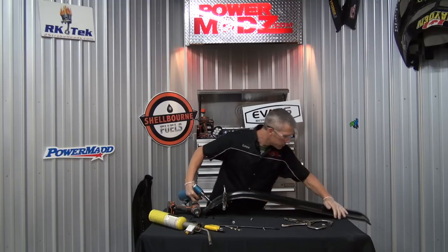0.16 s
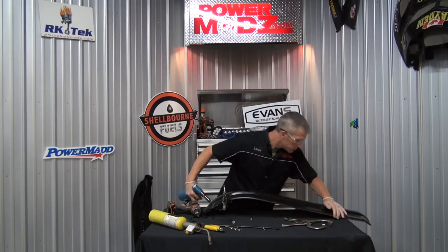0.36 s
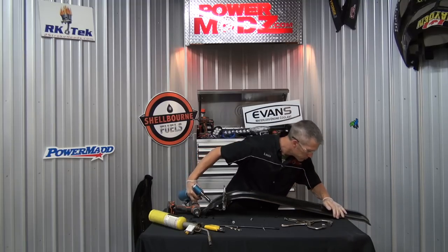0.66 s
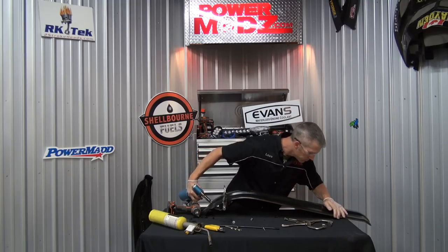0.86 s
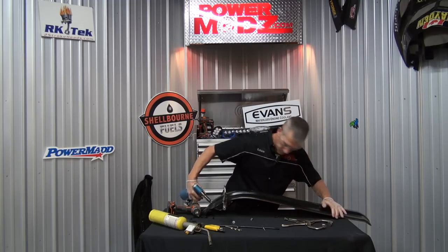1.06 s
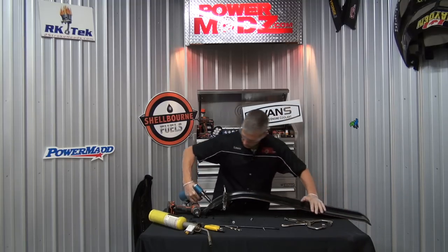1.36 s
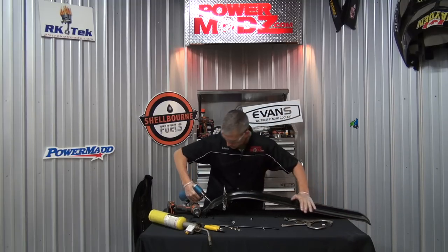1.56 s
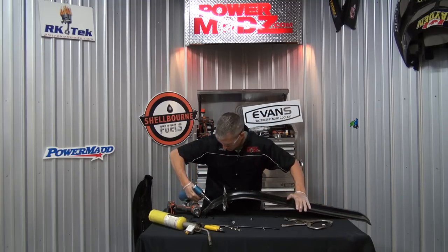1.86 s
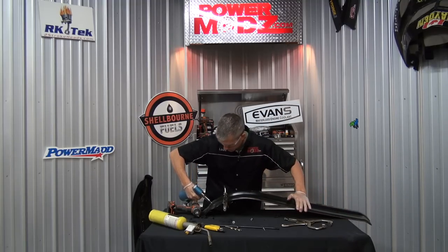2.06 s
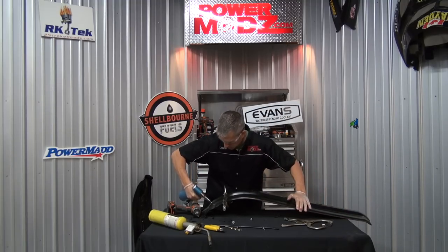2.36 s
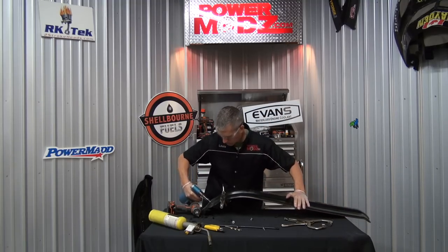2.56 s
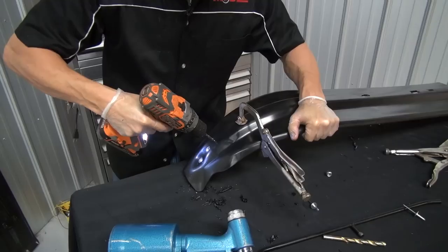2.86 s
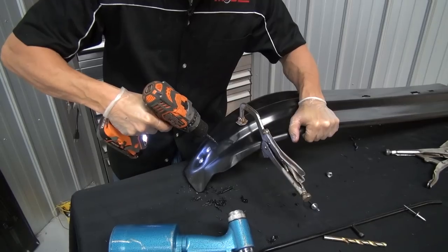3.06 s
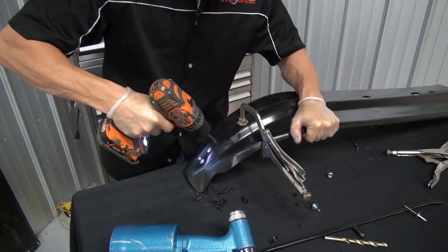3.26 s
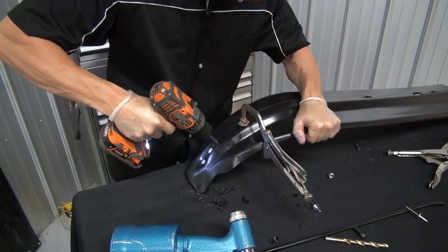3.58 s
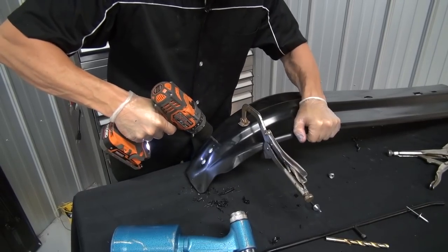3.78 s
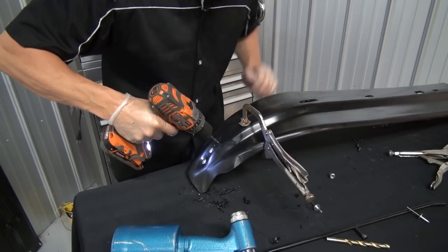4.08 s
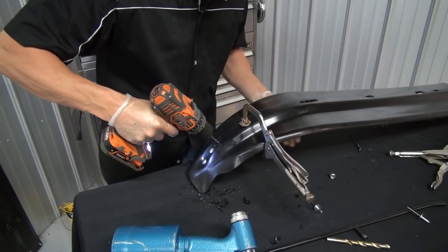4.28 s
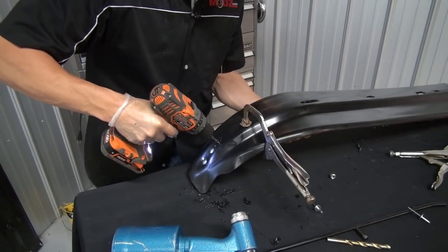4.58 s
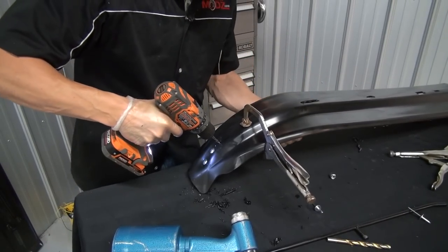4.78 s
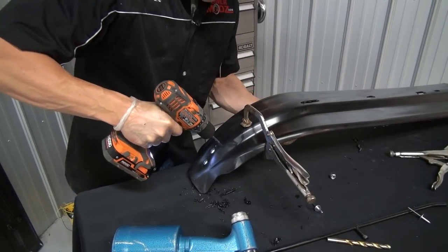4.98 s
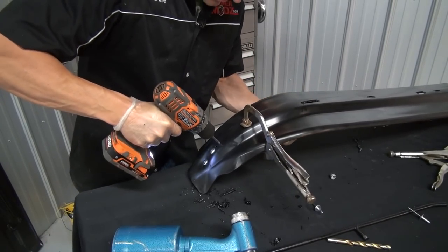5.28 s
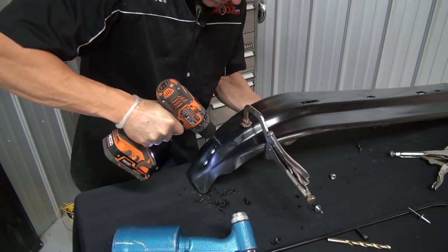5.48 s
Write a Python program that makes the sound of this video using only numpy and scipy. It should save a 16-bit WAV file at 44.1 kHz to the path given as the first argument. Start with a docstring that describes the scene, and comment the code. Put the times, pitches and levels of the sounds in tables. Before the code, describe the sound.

Over faint workshop hiss, a plastic ski knocks sharply on a bench at about 0.2 seconds. From 1.1 to 2 seconds it is shifted with quiet sliding, a tiny squeak, brushing sleeves, tool ticks and a couple of lighter knocks. At 2.1 seconds an air riveter clacks and fills, snaps the rivet with a loud crack at 2.25, and at 2.5 vents a strong, fading jet of air. This cuts off at 2.9 seconds, leaving a brighter background hiss. At 3.2 a cordless drill spins up, quieter than the riveter, with motor whine, whirring gears and soft thuds as the bit catches. It brakes with a jolt just before 4 seconds. A faint knock and small plastic squeaks come near 4.9. The drill starts again at 5 seconds and runs to the end, around 5.7. Metal walls add a short reverberation to the knocks and tools.

```python
"""A workshop with sheet-metal walls. A plastic ski knocks on the bench, its plate modes ringing, then
slides and squeaks as it is shifted. An air riveter clacks, fills, snaps its mandrel and vents a fading
jet. At 2.9 s a hard cut leads to a cordless drill that spins up twice in the ski: motor whine and gear
mesh over the rush of fan, gears and bit. The bit thumps the bench and a brake stops the first run.
The walls throw back the knocks and both tools, over a bed of hiss."""
import sys
import numpy as np
from scipy import signal
from scipy.fft import rfft, irfft, next_fast_len
from scipy.io import wavfile
from scipy.ndimage import map_coordinates

SR = 44100
rng = np.random.default_rng(int(sys.argv[2]) if len(sys.argv) > 2 else 0)


def generate_wav(sig):
    """Save sig (samples, or channels by samples) to the path in sys.argv[1] as 16-bit PCM at SR."""
    pcm = np.round(np.clip(np.atleast_2d(sig).T, -1, 1) * 32767).astype(np.int16)
    wavfile.write(sys.argv[1], SR, pcm)


N = 248272
TIME = np.arange(N) / SR
CUT_S = 2.899

# Noise beds: room tone and thin hiss before the cut, hiss after it (frequency [Hz], relative level [dB])
ROOM_TONE_COLOUR = [(29, -27), (50, -13), (75, -18), (114, -8), (184, -12.5), (694, -6), (1300, -10),
                    (1700, -11), (2010, -8), (3330, -4.5), (4350, -9.5), (5670, -8.5), (8540, -12),
                    (10100, -9), (16000, -14)]
THIN_HISS_COLOUR = [(8500, -15), (10100, 0), (11500, -13), (16000, -16)]
HISS_COLOUR = [(29, -53), (50, -18.5), (218, -10), (380, -8), (495, -7), (545, -7), (586, -10), (711, -5),
               (1070, -5), (1700, -11.5), (2320, -3.5), (3950, -9), (5950, -1), (10400, -10), (16000, -4.5)]
# Fader ride of the thin hiss (time [s], relative level [dB])
THIN_HISS_RIDE = [(0.1, -66), (0.39, -60), (1.56, -61), (1.71, -55), (2.1, -55.5)]
# Peaks and dips in the hiss after the cut (frequency [Hz], width [Hz], gain [dB])
HISS_PEAKS = [(6000, 900, -0.5), (8500, 1500, 0.5), (10200, 2300, 10), (12700, 900, 4), (14300, 1100, -3)]
# Reverb tail of the walls (frequency [Hz], t60 [s])
WALL_T60 = [(125, 0.23), (500, 0.94), (1000, 1.0), (3000, 0.92), (8000, 0.2), (16000, 0.3)]

# Knocks on the ski; piston blows on the clamped tip (time [s], level [dB], contact brightness [Hz])
SKI_KNOCKS = [(.040, -48, 3000), (.136, -38.5, 4000), (.2105, -16.5, 1200), (.2192, -6.5, 5030),
              (.255, -24, 895), (.265, -19, 890), (1.314, -30, 500), (1.564, -46, 9000), (1.948, -26, 1275),
              (1.961, -31, 700), (2.837, -33.5, 3020), (3.184, -34, 600), (3.208, -37, 4000),
              (4.885, -41.5, 3000)]
PISTON_CLACKS = [(2.1275, -16, 1700), (2.136, -16, 1500), (2.2503, -7, 4060), (2.531, -13, 2000)]
# Dense plate modes of ski and tip (frequency [Hz], relative level [dB])
SKI_COLOUR = [(47, -40), (80, -25.5), (191, -20.5), (374, -3.5), (464, 0.5), (566, -11.5), (892, 1.5),
              (984, 1), (1110, -3), (1300, -5.5), (2000, -16), (3420, -32.5), (9000, -39), (11700, -86),
              (19800, -120)]
TIP_COLOUR = [(59, -39), (100, -20.5), (430, -8.5), (581, -3), (732, -0.5), (1120, 2), (1630, -8.5),
              (3040, -8.5), (3200, -24), (3440, -49), (3690, 0.5), (4180, -15), (7000, -32), (9100, -53),
              (15400, -120)]
# Their decay (frequency [Hz], t60 [s])
SKI_T60 = [(120, 0.29), (400, 0.081), (1000, 0.048), (2500, 0.061), (6000, 0.026)]
TIP_T60 = [(120, 0.24), (400, 0.23), (1100, 0.054), (2500, 0.082), (6000, 0.05)]
# Their strongest single modes (frequency [Hz], gain [dB], t60 [s])
SKI_MODES = [(128.5, -28, 0.3), (371.4, -16, 0.12), (584, -10.5, 0.11), (704, -11, 0.11),
             (904, -10.5, 0.027), (1130, -10, 0.073), (2030, -20, 0.061), (2284, -25.5, 0.086),
             (2720, -10.5, 0.017), (4600, -15, 0.013), (5350, -21, 0.013)]
TIP_MODES = [(208.6, -27.5, 0.59), (623, -20, 0.052), (865, -5.5, 0.065), (1110, -22, 0.31),
             (1460, -13.5, 0.16), (3490, -29, 0.11)]

# Moves of ski and arms (centre time [s], half length [s], slide level [dB], brush level [dB])
SHIFTS = [(0.171, 0.032, -44, -58.5), (1.142, 0.07, -62.5, -59), (1.274, 0.026, -53, -48),
          (1.338, 0.032, -51, -62), (1.442, 0.28, -56, -54.5), (1.56, .022, -69, -53),
          (4.896, 0.027, -53.5, -62)]
# Hard ticks of tools and clamp (time [s], level [dB], t60 [s])
TOOL_TICKS = [(1.122, -50, .08), (1.565, -52, 0.043), (1.674, -44.5, 0.036), (1.949, -42, 0.081),
              (2.006, -46, 0.045)]
# Sliding plastic, brushing sleeves and ticks (frequency [Hz], relative level [dB])
SLIDE_COLOUR = [(59, -47), (100, -11), (271, -7), (460, -4.5), (524, -4.5), (696, 3), (802, -7), (1110, -7),
                (1550, -21), (2200, -28), (2860, -47), (4840, -120)]
SLEEVE_COLOUR = [(1180, -40), (2000, -7), (3230, -8), (4380, -1), (6880, -5.5), (14900, -6), (16000, -2)]
TICK_COLOUR = [(1500, -6), (2500, 2), (4500, -0.5), (7000, -10), (14000, -11)]
# Slips of the plastic (centre time [s], pitch [Hz], level [dB], half length [s])
SQUEAKS = [(1.152, 720, -43.5, 0.012), (4.911, 525, -50.5, 0.028), (4.995, 610, -48, 0.027)]

# Cracks of valve, mandrel and vent (time [s], level [dB], attack [s], t60 [s], puff level [dB])
RIVETER_CRACKS = [(2.121, -21.5, 0.0075, 0.096, -62), (2.2504, -5.5, 0.00026, 0.038, -24.5),
                  (2.526, -12, 0.0014, 0.15, -33)]
# Gusts of exhaust (time [s], attack [s], t60 [s], rush level [dB], jet level [dB])
EXHAUST_GUSTS = [(2.526, 0.0076, 0.4, -21, -10), (2.582, 0.033, 0.79, -22, -17.5),
                 (2.63, 0.047, 0.97, -24.5, -22.5), (2.833, .008, 0.79, -28, -34.5)]
# The riveter's noise layers (frequency [Hz], relative level [dB])
CRACK_COLOUR = [(710, -53), (1200, 5.5), (1700, -10), (3150, -2.5), (3430, -6), (6030, -6), (11200, -7),
                (12500, -2), (16000, -18)]
FILL_COLOUR = [(1060, -44.5), (1800, -12), (2720, 2.5), (3710, -8), (4250, -6), (5060, -8), (6410, 1.5),
               (7360, -4.5), (11900, -3), (15300, -5), (16000, -14.5)]
STROKE_COLOUR = [(53, -55.5), (90, -26), (201, -13.5), (393, -4.5), (467, -11), (568, -1), (935, -7.5),
                 (1140, -6), (1350, -7.5), (1470, -2.5), (1640, -4), (3220, -13), (3510, -15), (10100, -26),
                 (16000, -36)]
RUSH_COLOUR = [(59, -53), (100, -20), (289, -11), (374, -3.5), (407, -5), (564, 3.5), (960, 1.5), (1240, 4),
               (2040, -4), (2680, 5), (3470, 1), (4120, 3.5), (4800, 4), (6000, -8), (7800, -49),
               (13200, -120)]
JET_COLOUR = [(3060, -20), (5200, -6.5), (6190, -5.5), (6490, -5), (7090, -4.5), (7980, -5), (9580, -8),
              (11600, -5.5), (14100, -4), (15200, -10), (16000, -4.5)]
CORE_COLOUR = [(5600, -20), (6200, 0.5), (7800, 1), (8800, -16)]
# Resonances of the piston stroke and exhaust port (frequency [Hz], width [Hz], gain [dB])
STROKE_PEAKS = [(600, 50, 2.5), (835, 40, -2), (1140, 83, 8), (1500, 110, 4), (1720, 350, -12.5),
                (3220, 150, 10), (4500, 150, 7)]
PORT_PEAKS = [(1150, 140, 3), (2700, 160, 1), (3480, 150, -6), (4800, 190, -9), (5570, 180, 2),
              (6200, 110, 7), (6850, 90, -4), (6950, 100, 0), (8050, 120, 3)]

# The bit catches and shakes the bench (time [s], level [dB])
BIT_CATCHES = [(3.186, -43), (3.483, -38.5), (3.55, -50), (3.716, -40.5), (3.885, -44), (3.949, -35),
               (3.995, -43), (5.531, -43)]
# Trigger pulls (start [s], release [s], top speed [turns/s], spin-up time constant [s])
TRIGGER_PULLS = [(3.188, 3.918, 309.5, .091), (5.009, 6.0, 299.1, .08)]
# Drill noise in each run (gear trim [dB], fan trim [dB], gear swell [dB/s], fan swell [dB/s],
# speed exponent [-])
DRILL_LOADS = [(-21.5, -24.5, -0.5, -5, 1.6), (-21.5, -28.5, 1, 9, 0.91)]
# Motor and gear tones (multiple of motor speed [-], first-run trim [dB], second-run trim [dB])
MOTOR_TONES = [(1, -38.5, -38.5), (2, -36, -41), (3, -40, -42), (4, -42, -42), (5, -37, -42),
               (10, -38, -39), (11, -40, -42), (11.25, -33, -33), (13, -39, -39), (14, -45, -39),
               (20, -38, -40), (22.5, -52, -35), (30, -46, -38), (42, -46, -55), (50, -48, -48)]
# Gears and fan in each run (frequency [Hz], relative level [dB])
FIRST_GEAR_COLOUR = [(200, -50), (340, -18.5), (516, -13), (599, -7.5), (658, -7.5), (1500, -7.5),
                     (1730, -13), (3400, -2.5), (4280, -4), (4510, -10.5), (4890, -3.5), (6490, -12),
                     (7330, -5.5), (8500, -26), (11000, -47), (18700, -120)]
SECOND_GEAR_COLOUR = [(200, -28), (340, -18.5), (439, -3), (489, -14), (583, -2), (1100, -6), (1360, -6.5),
                      (1880, -10.5), (2240, -5), (4160, -5.5), (4330, -4), (5030, -4.5), (6490, -3),
                      (8500, -9), (11000, -30), (18700, -120)]
FIRST_FAN_COLOUR = [(4410, -27), (7500, -3), (8600, -3.5), (13200, -1.5), (15100, -4), (16000, -10)]
SECOND_FAN_COLOUR = [(4410, -27), (7500, -6), (9850, 1), (10700, -3.5), (14200, -8), (15200, -9),
                     (16000, -7)]
# Resonances of the drill body and fan vents (frequency [Hz], width [Hz], gain [dB])
BODY_PEAKS = [(1360, 82, 4.5), (1840, 160, -2), (2140, 280, 2.5), (3630, 540, 1.5), (6400, 600, 0),
              (6780, 310, 1)]
VENT_PEAKS = [(7200, 450, 4), (10540, 530, 2.7), (13500, 600, 3)]
# The brake bites, then the gears take up their slack (time [s], level [dB], t60 [s])
GEARBOX_JOLTS = [(3.961, -25, 0.06), (5.015, -36.5, 0.47)]
# Bench thud, gearbox jolt and brake sizzle (frequency [Hz], relative level [dB])
BENCH_COLOUR = [(40, -30), (90, -5), (150, -2.5), (230, -0.5), (400, -1.5)]
JOLT_COLOUR = [(400, 3), (1000, 0), (2300, 6.5), (4000, -2), (7000, -10), (10000, -6), (16000, -12)]
SIZZLE_COLOUR = [(8500, -20), (11000, 5), (12500, -1), (16000, -10)]


def from_db(db):
    """Decibels to gain."""
    return 10 ** (np.asarray(db) / 20)


def unit_rms(x):
    """Scale to unit power."""
    return x / np.sqrt(np.mean(x ** 2) + 1e-20)


def at_hz(points, hz):
    """Read a table on a log-frequency axis."""
    table_hz, values = np.transpose(points)
    return np.interp(np.log(hz + 1), np.log(table_hz), values)


def since(s):
    """Seconds gone by after time s."""
    return np.maximum(TIME - s, 0)


def swell(s, half_s):
    """Smooth rise and fall around time s."""
    return np.exp(-((TIME - s) / half_s) ** 2)


def burst(s, attack, t60):
    """Envelope that rises at time s and dies away."""
    age = since(s)
    return np.minimum(age / attack, 1) * from_db(-60 * np.maximum(age - attack, 0) / t60)


def drift(rate_hz):
    """Random wobble at unit power."""
    knots = rng.standard_normal(4096)
    return unit_rms(np.interp(TIME * rate_hz, np.arange(len(knots)), knots))


def noise(colour, peaks=()):
    """Coloured noise with bell-shaped resonances, at unit power."""
    size = next_fast_len(N)
    hz = np.arange(size // 2 + 1) * SR / size
    octaves_outside = np.abs(np.log2((hz + 1) / np.clip(hz + 1, colour[0][0], colour[-1][0])))
    db = at_hz(colour, hz) - 20 * octaves_outside
    for centre, width, lift in peaks:
        db = db + lift / (1 + (2 * (hz - centre) / width) ** 2)
    white = rfft(rng.standard_normal(size))
    return unit_rms(irfft(white * from_db(db), size)[:N])


def varispeed(x, speed):
    """Bend the pitch of x by playing it at a changing speed."""
    return map_coordinates(x, [np.cumsum(speed)])


def room_tone():
    """A quiet bed with a thin, high hiss creeping up over it."""
    ride_db = np.interp(TIME, *np.transpose(THIN_HISS_RIDE)) - 1.5
    return from_db(-56) * noise(ROOM_TONE_COLOUR) + from_db(ride_db) * noise(THIN_HISS_COLOUR)


def ring(drive, hz, t60):
    """One mode: a unit click sets a sine of height 1 ringing."""
    radius, step = from_db(-60 / (t60 * SR)), 2 * np.pi * hz / SR
    return signal.lfilter([0, np.sin(step)], [1, -2 * radius * np.cos(step), radius ** 2], drive + 1e-18)


def strikes(hits, colour, t60s, modes):
    """Each blow wakes a few strong modes and a dense wash of plate modes; soft contacts sound dull."""
    s, db, bright_hz = np.transpose(hits)
    centres = np.geomspace(100, 12800, 8)
    spectrum = rfft(noise(colour))
    octave = np.log2(np.clip(np.arange(len(spectrum)) * SR / N, centres[0], centres[-1]))

    def blows(hz):
        """Strength of every blow at one frequency, as clicks."""
        clicks = np.zeros(N)
        clicks[(s * SR).astype(int)] = from_db(db) / np.sqrt(1 + (hz / bright_hz) ** 2)
        return clicks

    out = sum((-1) ** k * from_db(gain_db) * ring(blows(hz), hz, t60)
              for k, (hz, gain_db, t60) in enumerate(modes))
    for hz in centres:
        band = irfft(spectrum * np.maximum(1 - np.abs(octave - np.log2(hz)), 0), N)
        energy_kept = from_db(-60 / (at_hz(t60s, hz) * SR)) ** 2
        envelope = np.sqrt(signal.lfilter([1], [1, -energy_kept], blows(hz) ** 2 + 1e-18))
        soften = signal.butter(2, hz / 2, fs=SR, output="sos")   # a mode needs a cycle to build up
        out = out + band * signal.sosfilt(soften, envelope)
    return out


def ski_knocks():
    """The ski is set down and nudged; the room answers."""
    low_cut = signal.butter(2, 100, "high", fs=SR, output="sos")   # the knocks keep clear of the deep bass
    ski = signal.sosfilt(low_cut, strikes(SKI_KNOCKS, SKI_COLOUR, SKI_T60, SKI_MODES))
    return ski + from_db(-15) * wall_reverb(ski)


def wall_reverb(send, early_gain=0.74, early_t60=0.2, predelay_s=0.006):
    """Dense reflections off the metal walls, then a tail that hangs longest in the mids."""
    t, response = TIME[:SR], 0
    early = early_gain * from_db(-60 * t / early_t60)
    edges = np.geomspace(70, 17000, 10)
    for low, high in zip(edges, edges[1:]):
        bandpass = signal.butter(2, [low, high], "band", fs=SR, output="sos")
        tail = from_db(-60 * t / at_hz(WALL_T60, np.sqrt(low * high)))
        response = response + signal.sosfilt(bandpass, rng.standard_normal(SR)) * (early + tail)
    response = response * (t > predelay_s)
    return signal.fftconvolve(send, response / np.sqrt(np.sum(response ** 2)))[:N]


def handling():
    """Plastic drags unevenly over cloth while sleeves brush and tools tick."""
    slide = sum(from_db(db) * swell(s, half) for s, half, db, _ in SHIFTS)
    brush = sum(from_db(db) * swell(s, half) for s, half, _, db in SHIFTS)
    ticks = noise(TICK_COLOUR) * sum(from_db(db) * burst(s, 0.001, t60) for s, db, t60 in TOOL_TICKS)
    grain = from_db(2 * drift(69.6))
    return slide * grain * noise(SLIDE_COLOUR) + brush * noise(SLEEVE_COLOUR) + ticks


def squeaks(waver=0.029):
    """Plastic sticks and slips in short, unsteady tones."""
    out = 0
    for s, hz, db, half in SQUEAKS:
        phase = 2 * np.pi * np.cumsum(hz * (1 + waver * drift(300))) / SR
        out = out + from_db(db) * swell(s, half) * np.sin(phase)
    return out


def riveter(fill_s=2.187, stroke_s=2.284, vent_s=2.528):
    """Air fills the cylinder, the mandrel snaps, the piston runs on, and the air vents."""
    clacks = strikes(PISTON_CLACKS, TIP_COLOUR, TIP_T60, TIP_MODES)
    snaps = sum(from_db(db) * burst(s, attack, t60) for s, db, attack, t60, _ in RIVETER_CRACKS)
    cracks = snaps * noise(CRACK_COLOUR)
    puffs = sum(from_db(db) * burst(s, attack=0.0052, t60=0.3) for s, *_, db in RIVETER_CRACKS)
    leak = from_db(-45.5) * (TIME > fill_s) * (TIME < stroke_s)
    fill = (from_db(-29) * swell(fill_s, half_s=0.017) + leak) * noise(FILL_COLOUR)
    travel = burst(stroke_s, attack=0.063, t60=0.78) * (TIME < vent_s)
    stroke = from_db(-18.5 + 1.1 * drift(230)) * travel * noise(STROKE_COLOUR, STROKE_PEAKS)
    air = fill + stroke + exhaust()
    send = from_db(-16.5) * clacks + from_db(-19.5) * (cracks + air)
    return clacks + cracks + puffs + air + wall_reverb(send)


def exhaust(core_s=2.58, core_attack_s=0.078, sag_octaves_per_s=3.0):
    """Gusts rush and hiss through the port; the valve's shrill core sinks as the pressure falls."""
    rush_power = sum((from_db(db) * burst(s, attack, t60)) ** 2 for s, attack, t60, db, _ in EXHAUST_GUSTS)
    jet_power = sum((from_db(db) * burst(s, attack, t60)) ** 2 for s, attack, t60, _, db in EXHAUST_GUSTS)
    rush = np.sqrt(rush_power) * noise(RUSH_COLOUR, PORT_PEAKS)
    jet = np.sqrt(jet_power) * noise(JET_COLOUR, PORT_PEAKS)
    pitch = 2 ** (-sag_octaves_per_s * since(core_s + core_attack_s))
    core = from_db(-19.5) * burst(core_s, core_attack_s, t60=0.55) * varispeed(noise(CORE_COLOUR), pitch)
    return rush + jet + core


def hiss_bed():
    """Steady, bright hiss behind the drilling."""
    return from_db(-45.5) * noise(HISS_COLOUR, HISS_PEAKS)


def bench_thuds():
    """The bit catches and the bench gives a dull thud."""
    return noise(BENCH_COLOUR) * sum(from_db(db) * burst(s, 0.0033, t60=0.21) for s, db in BIT_CATCHES)


def motor_speed(start, release, top, spin_up, brake_delay_s=0.04):
    """Turns per second: the motor winds up, labours as the bit bites, sags on release and is braked."""
    driven = top * (1 - np.exp(-since(start) / spin_up))
    bite = 4.6 * swell(3.545, half_s=0.15)
    sag = 285 * since(release)
    brake = 2400 * since(release + brake_delay_s)
    return np.maximum(driven - bite - sag - brake, 0)


def pinion_whine(angle, pace, powered, run, teeth=15, trim_db=(-23, -24), drop_db=(11, 6.5)):
    """Meshing teeth sing loudest near top speed and stutter most halfway through the spin-up."""
    slowness = 1 - pace
    loss_db = np.minimum(170 * slowness, drop_db[run]) + 10 * slowness   # steep at first, then gentle
    flutter_db = (0.8 + 12 * slowness * pace * powered) * drift(35)
    return from_db(trim_db[run] - loss_db + flutter_db) * np.sin(teeth * angle)


def motor_whine(angle, speed, pace, powered, run, housing_hz=2140, half_width_hz=110, lift_db=(29, 28)):
    """Tones locked to the shaft fade as it slows, much sooner with the current off."""
    loss_db = np.where(powered, 16, 45) * (1 - pace)
    whine = 0
    for multiple, *trim_db in MOTOR_TONES:
        db = trim_db[run] + 1.2 * drift(35) - loss_db
        if multiple == 10:   # under current the pole hum rings the housing as it sweeps through
            detune = (multiple * speed - housing_hz) / half_width_hz
            db = db + powered * lift_db[run] / (1 + detune ** 2)
        whine = whine + from_db(db) * np.sin(multiple * angle + rng.uniform(0, 2 * np.pi))
    return whine


def drill(gear_colour, fan_colour, run, unload_db=4.5, unload_s=0.082):
    """One trigger pull: the whine swells with speed, gear noise throbs once a turn and the fan blows."""
    start, release, top, spin_up = TRIGGER_PULLS[run]
    gear_db, fan_db, gear_swell, fan_swell, exponent = DRILL_LOADS[run]
    speed = motor_speed(start, release, top, spin_up)
    angle = 2 * np.pi * np.cumsum(speed * (1 + 0.0004 * drift(60))) / SR
    pace, age, powered = speed / top, since(start), TIME < release
    coasting = np.minimum(since(release) / unload_s, 1)   # the gears unload after release
    gear_gain = pace ** exponent * from_db(gear_db + gear_swell * age - unload_db * coasting)
    fan_gain = pace ** (exponent + 0.3) * from_db(fan_db + fan_swell * age)
    whine = pinion_whine(angle, pace, powered, run) + motor_whine(angle, speed, pace, powered, run)
    tones = whine * gear_gain / gear_gain.max()
    throb = 1 + 0.12 * np.sin(angle)
    rattle = from_db(0.43 * drift(500))
    fan = from_db(-1.5) * fan_gain * varispeed(noise(fan_colour, VENT_PEAKS), pace ** 0.25)
    gears = from_db(-0.42) * gear_gain * throb * rattle * noise(gear_colour, BODY_PEAKS)
    rumble = from_db(-32) * gear_gain * noise(BENCH_COLOUR)
    rush = gears + fan + rumble
    return tones + rush + wall_reverb(from_db(-17) * rush + from_db(-11.5) * tones)


def brake_and_gearbox():
    """The brake bites with a jolt and a sizzle; the gears jolt again as they take up their slack."""
    jolts = sum(from_db(db) * burst(s, 0.0018, t60) for s, db, t60 in GEARBOX_JOLTS)
    sizzle = from_db(-27.5) * swell(3.964, half_s=0.0069)
    return jolts * noise(JOLT_COLOUR) + sizzle * noise(SIZZLE_COLOUR)


def scene():
    """Riveting cuts to drilling, with the ski's own sounds across both; mono on two channels."""
    riveting = room_tone() + riveter()
    first_run = drill(FIRST_GEAR_COLOUR, FIRST_FAN_COLOUR, run=0)
    second_run = drill(SECOND_GEAR_COLOUR, SECOND_FAN_COLOUR, run=1)
    drilling = hiss_bed() + bench_thuds() + first_run + second_run + brake_and_gearbox()
    mono = ski_knocks() + handling() + squeaks() + np.where(TIME < CUT_S, riveting, drilling)
    return np.array([mono, mono])


def record(dry, ceiling=0.95, cutoff_hz=15900):
    """The loudest peaks overload and a steep low-pass shaves off the top."""
    high_cut = signal.ellip(12, 0.1, 80, cutoff_hz, fs=SR, output="sos")
    return signal.sosfilt(high_cut, np.clip(dry, -ceiling, ceiling))


dry = scene()
out = record(dry)
generate_wav(out)
```